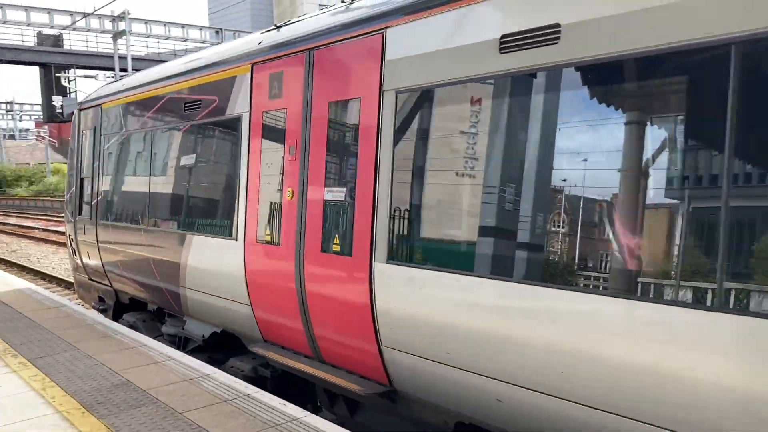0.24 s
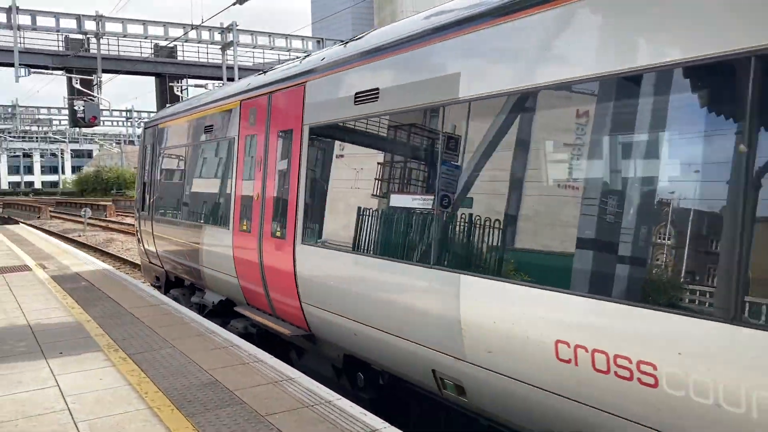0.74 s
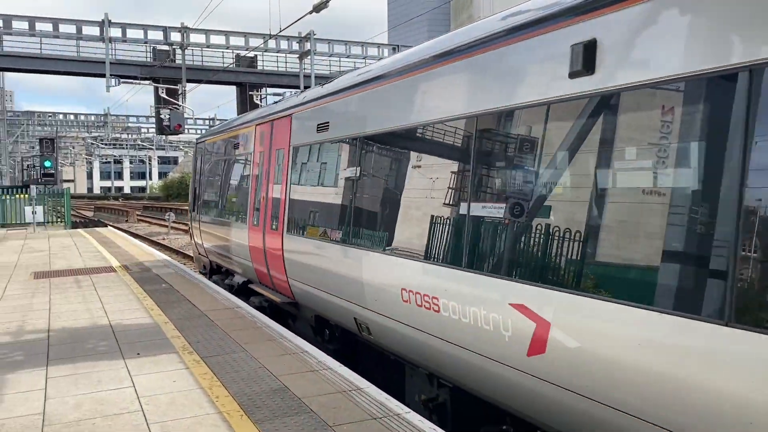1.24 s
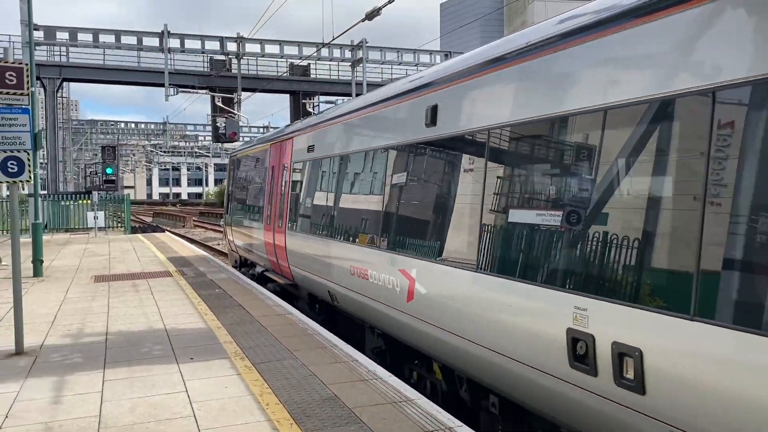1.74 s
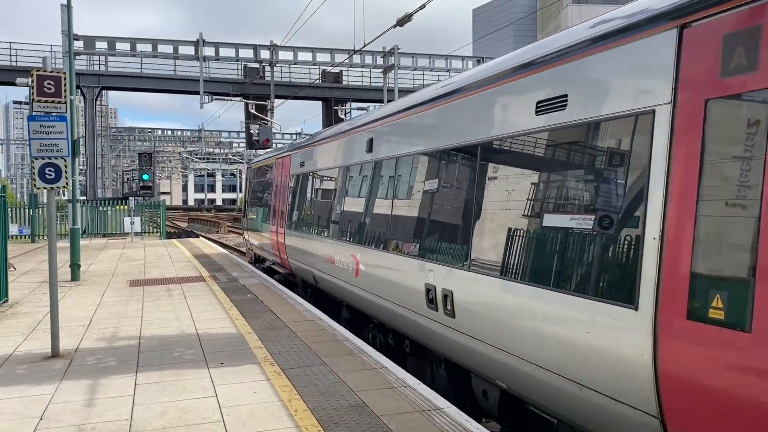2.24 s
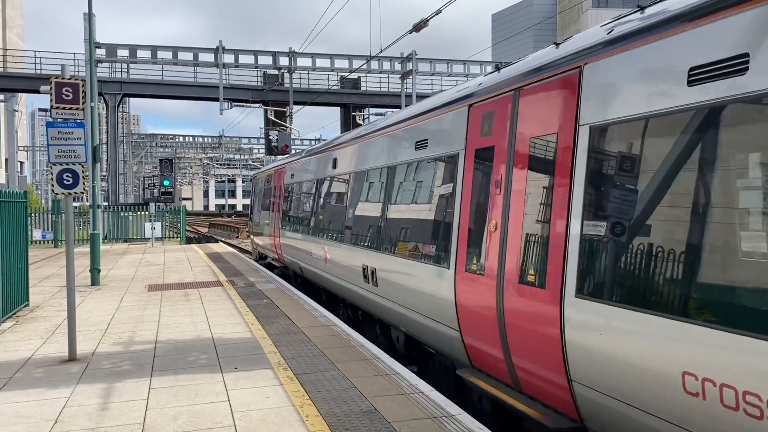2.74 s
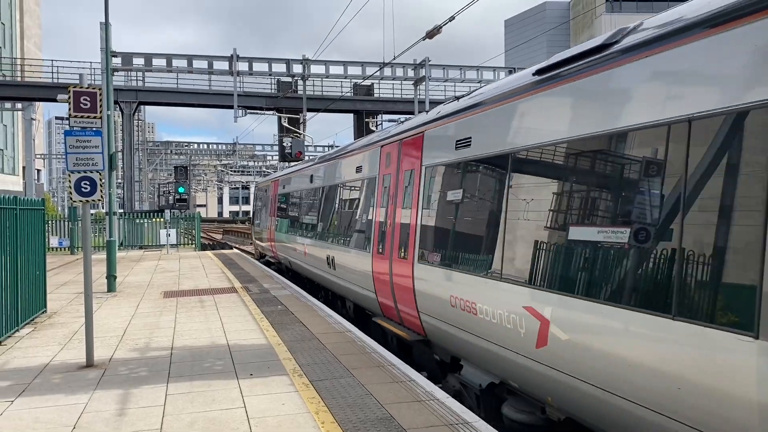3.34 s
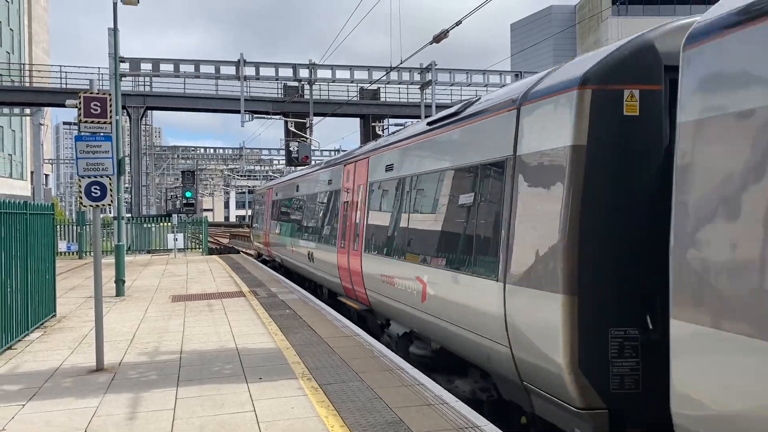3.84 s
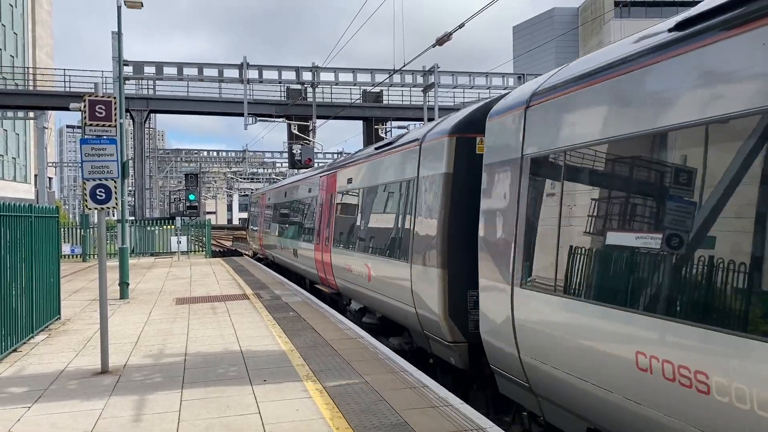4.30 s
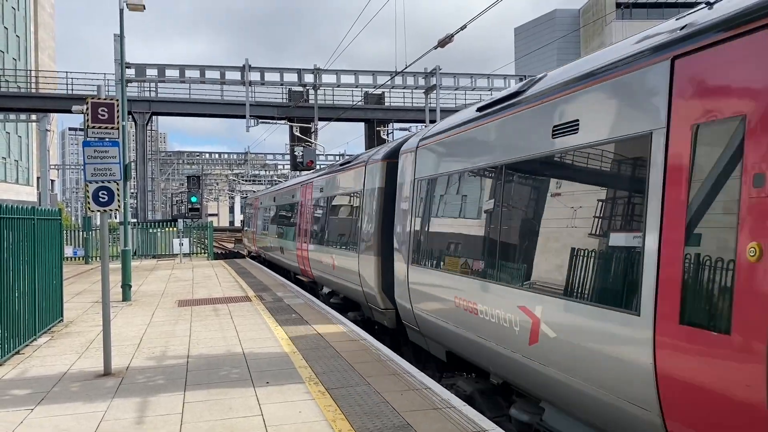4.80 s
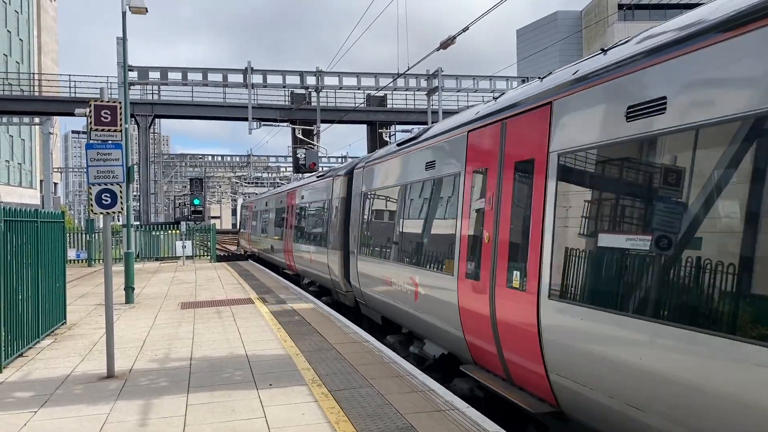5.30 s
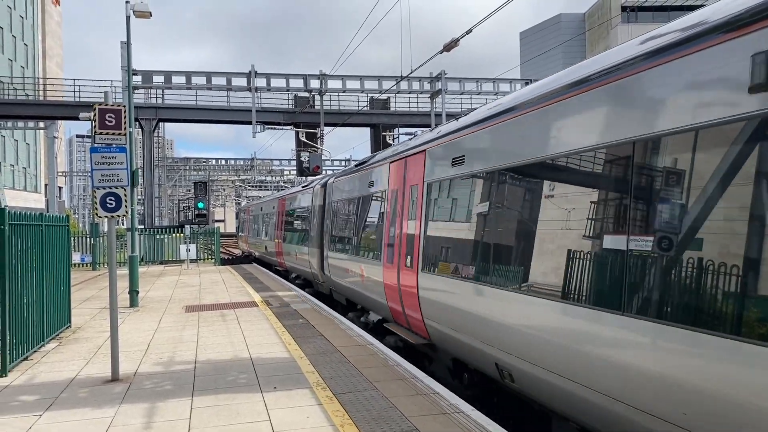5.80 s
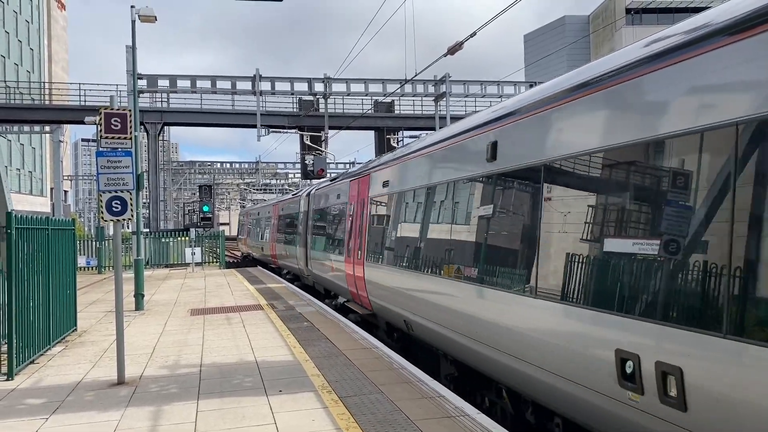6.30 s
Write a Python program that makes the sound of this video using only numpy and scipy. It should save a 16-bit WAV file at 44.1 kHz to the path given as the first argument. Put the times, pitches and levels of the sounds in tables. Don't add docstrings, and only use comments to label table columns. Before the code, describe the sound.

Close stereo sound on an open station platform as a diesel passenger train passes. From 0 s a low, throbbing engine drone wavers over soft wheel rumble, with dull thumps at about 0.3, 0.9 and 1.1 s. Around 1.5 to 2.5 s the clatter and breathy air rush grow, with a faint high turbo whistle and thin singing panels. A steady mid-high gear whine stands out around 2.5 to 3.4 s; a firm thud lands near 2.9 s, and the deep engine hum surges at about 3.2 s, broad and abreast of the listener. It beats and eases through 4 to 5 s, with a short woody creak at 4.6 s and a soft thump just after. From 5.2 s a low rising hum joins, and rumble, throbbing, roar and bright cooling-air hiss build to the fullest level by 6.3 s, ending abruptly near 6.6 s without fading away.

```python
import sys
import numpy as np
from scipy import signal
from scipy.fft import rfft, irfft, next_fast_len
from scipy.io import wavfile
from scipy.ndimage import uniform_filter1d

SR = 44100
rng = np.random.default_rng(int(sys.argv[2]) if len(sys.argv) > 2 else 0)


def field_ratio(decibels):
    return 10 ** (np.asarray(decibels, dtype=float) / 20)


def int16_out(signal):
    q = np.round(np.clip(np.atleast_2d(signal).T, -1, 1) * 32767)
    wavfile.write(sys.argv[1], SR, q.astype(np.int16))


N = 288855

# frequency in Hz, lead of the left port in radians.
ALONG_PHASE = [(0, 0), (520, -1.7), (1300, -3), (2500, -5.9), (4000, -6.1), (6940, -6.28), (15350, -18.85),
               (16000, -19)]


def evened(x):
    return x / np.sqrt(np.mean(x ** 2) + 1e-20)


def read(points, hz):
    f, value = np.transpose(points)
    return np.interp(np.log(hz + 1), np.log(f + 1), value)


def curves(rows, t):
    s, *columns = np.transpose(rows)
    return [np.interp(t, s, c) for c in columns]


def drift(t, rate):
    total = 0
    for f in np.geomspace(.3, rate, 12):
        total = total + np.sin(2 * np.pi * (f * t + rng.random())) / np.sqrt(f)
    return evened(total)


def wander(rate):
    t = np.arange(0, N + 256, 256)
    return np.interp(np.arange(N), t, drift(t / SR, rate))


def passing(parts, t):
    power = sum(field_ratio(db) ** 2 / (1 + ((t - s) / reach) ** 2) for s, db, reach in parts)
    return 10 * np.log10(power)


def fading(fades, t):
    return sum(db * np.maximum(1 - abs(t - s) / half, 0) for s, db, half in fades)


def resonate(x, hz, width):
    turn = np.exp(2j * np.pi * np.cumsum(hz * np.ones(N)) / SR)
    r = np.exp(-np.pi * width / SR)
    low = signal.lfilter([(1 - r) ** 2], [1, -2 * r, r * r], x / turn)
    return evened((turn * low).real)


def tone(hz, db, lag, pan_db=0.):
    angle = 2 * np.pi * (np.cumsum(hz) / SR + rng.random())
    left = field_ratio(pan_db / 2) * np.cos(angle - lag)
    right = field_ratio(-pan_db / 2) * np.cos(angle)
    return np.sqrt(2) * field_ratio(db) * np.array([left, right])


def ports(x):
    size = next_fast_len(N)
    turn = np.exp(1j * np.interp(np.fft.rfftfreq(size, 1 / SR), *np.transpose(ALONG_PHASE)))
    return np.array([irfft(rfft(x, size) * turn, size)[:N], x])


def layer_power(t, hz):
    # frequency in Hz, level in dB per Hz.
    rumble = [(20, -45), (30, -24), (42, 8), (58, 38.5), (90, 8.5), (140, 3.5), (220, -17), (400, -30)]
    roar = [(100, -30), (200, 1.5), (300, -2), (480, -6), (600, -6.5), (900, -8.5), (1300, -20),
            (2500, -52)]
    clatter = [(500, -7), (1000, 1.5), (1400, -3), (2000, -5), (2800, -11), (4000, -15), (6000, -25.5),
               (15000, -70)]
    hiss = [(1500, 7), (3000, -4.5), (4200, 2.5), (5600, 2), (7000, 3), (9500, -3), (12000, -4),
            (15800, -6)]
    layer_db = [3.2, 6.54, 4.8, 7.5]
    # time abreast in seconds, level abreast in dB, distance over speed in seconds.
    bogies = [(.1, -37, 0.36), (1.1, -30.5, 0.25), (2.2, -28.5, 0.68), (3.05, -25, 0.43),
              (4.6, -25.5, 0.41), (5.55, -21.5, 0.43), (6.35, -17.5, 0.24)]
    bodies = [(.5, -41, .8), (1.8, -33, 0.87), (3.1, -30, 0.7), (4.9, -30, 0.82), (5.6, -27.5, 0.21),
              (6.3, -20.5, 0.32)]
    valves = [(.3, -47, 1), (1.9, -30.5, 0.99), (3.1, -38, 0.72), (5.7, -27, 0.43), (6.3, -27, 0.29)]
    vents = [(.4, -51, .5), (1.9, -39.5, 0.56), (2.45, -49, .15), (3.5, -59.5, 0.084), (5.3, -43, 0.3),
             (6.4, -26.5, 0.39)]

    levels_db = [passing(parts, t) for parts in (bogies, bodies, valves, vents)]
    power = 0
    for shape, db, extra_db in zip((rumble, roar, clatter, hiss), levels_db, layer_db):
        colour = field_ratio(read(shape, hz)) ** 2
        share = (colour / colour.sum())[:, None]
        power = power + share * field_ratio(db + extra_db + .5 * drift(t, 11)) ** 2
    brighten = 0.45
    octaves = np.log2(np.maximum(hz, 6000) / 6000)[:, None]
    power = power * field_ratio(brighten * (levels_db[-1] + 38.5) * octaves) ** 2
    lift_db, lift_hz, lift_width_hz = 2, 9000, 900
    return power * field_ratio(lift_db * np.exp(-((hz - lift_hz) / lift_width_hz) ** 2))[:, None] ** 2


def port_link(t, hz):
    # frequency in Hz, left-right likeness from 0 to 1.
    same = [(40, .62), (120, .65), (250, .62), (500, .55), (1000, .68), (2200, .58), (4000, .74),
            (4700, .6), (5400, .1), (6200, .55), (7200, .58), (8100, .9), (9050, .99), (10100, .9),
            (11100, .97), (15000, .975)]
    # frequency in Hz, lead of the left port in radians.
    abreast_phase = [(0, 0), (700, -1.4), (1300, -1), (2200, 0), (3500, .4), (6940, 0), (15350, -12.57),
                     (16000, -12.7)]
    # time in seconds, share of sound arriving from along the platform from 0 to 1.
    direction = [
        (0, 0.65),
        (1.6, 0.9),
        (2.2, 0.17),
        (2.8, 0.02),
        (4.4, 0.1),
        (5, 0.55),
        (5.6, 0.76),
        (6.55, 0.83),
    ]
    along = np.clip(curves(direction, t)[0], 0, 1)
    turn = [np.exp(1j * np.interp(hz, *np.transpose(p)))[:, None] for p in (ALONG_PHASE, abreast_phase)]
    abreast_same = np.where(hz < 4000, 0.68, 1)[:, None]
    likeness = np.clip(read(same, hz), 0, 1)[:, None]
    return likeness * (along * turn[0] + (1 - along) * abreast_same * turn[1])


def running_noise():
    # frequency in Hz, left-right level difference in dB.
    tilt_db = [(60, 0.79), (120, 0.5), (240, 1), (480, 0.83), (950, -1.9), (1890, -0.28), (3770, 0.99),
               (7520, -1.5), (15000, 1)]
    frames, hz = N // 256 + 5, np.fft.rfftfreq(1024, 1 / SR)
    t = np.arange(frames) * 256 / SR
    power = layer_power(t, hz)
    a, b, c, d, patches = rng.standard_normal((frames, 513, 5)).T
    patches = evened(uniform_filter1d(uniform_filter1d(patches, 10, 0), 16, 1))
    link = port_link(t, hz)
    right = a + 1j * b
    left = link * right + np.sqrt(np.maximum(1 - abs(link) ** 2, 0)) * (c + 1j * d)
    tilt = field_ratio(read(tilt_db, hz) / 2)[:, None]
    z = np.array([left * tilt, right / tilt]) * np.sqrt(power) * field_ratio(patches)
    return 0.76 * signal.istft(z, nperseg=1024, noverlap=768)[1][:, :N]


def wheel_thumps(t):
    # start in seconds, level in dB, frequency in Hz, 60 dB decay time in seconds.
    thumps = [
        (0.311, -28, 85.5, 0.16),
        (.86, -21.5, 123, 0.088),
        (1.079, -24, 105, 0.13),
        (2.941, -21, 130, 0.14),
        (4.68, -28, 97, 0.23),
    ]
    out = np.zeros(N)
    for s, db, hz, t60 in thumps:
        age = np.maximum(t - s, 0)
        envelope = field_ratio(db + 12.5 - 60 * age / t60) * (1 - np.exp(-age / 0.0071))
        sag = 1 - 1.8 * np.minimum(age, .2)
        out += envelope * np.sin(2 * np.pi * hz * age * sag)
    return np.array([out, out])


def coupling_creak(t):
    # multiple of the slip rate, level in dB.
    slip_orders = [(13, 0), (12, -9), (11, -9)]
    release_s, level_db, rise_s = 4.643, -25, .066
    echo_db, echo_s = -8, .075
    slip_hz, slip_hz_per_s = 125, 50
    late = t - release_s
    swell = (late / rise_s) ** 4 - .5 * late / rise_s
    strain = np.exp(-np.where(late < 0, swell, (late / 0.0097) ** 2))
    strain = strain + field_ratio(echo_db) * (late > 0) * np.exp(-(late / echo_s) ** 4)
    turns = np.cumsum(slip_hz + slip_hz_per_s * np.clip(late, -.1, 0)) / SR
    slips = sum(field_ratio(db) * np.cos(2 * np.pi * (k * turns + rng.random())) for k, db in slip_orders)
    scrape = field_ratio(-14) * resonate(rng.standard_normal(N), 1480., 250.)
    creak = field_ratio(level_db) * strain * (slips + scrape)
    return np.array([np.roll(creak, 7), creak])


def singing_panels(t):
    # start in seconds, end in seconds, frequency in Hz, width in Hz, level in dB.
    strands = [(0, .9, 1546, 10, -50), (.9, 2.2, 1511, 10, -48), (2.45, 3, 1508, 8, -40),
               (.5, 2.6, 1131, 12, -42.5), (2.4, 4.4, 1336, 10, -44), (1.75, 2.3, 3862, 18, -43.5),
               (3.1, 4.5, 502, 14, -39), (3.4, 4.4, 471, 22, -39), (5.2, 6, 2386, 110, -47),
               (5.2, 6.55, 1669, 25, -46), (5.5, 6.6, 433, 8, -34), (5.9, 6.9, 4300, 800, -38),
               (5.2, 6.1, 479, 10, -37), (1.3, 2.7, 12900, 700, -50), (5.9, 6.6, 870, 120, -33),
               (.5, 2.1, 288, 5, -36), (1.5, 2.8, 1065, 20, -45), (1.2, 2.9, 862, 25, -42),
               (1.3, 2.2, 705, 16, -42), (3, 3.6, 1508, 10, -46), (5.7, 6.6, 712, 16, -36),
               (.9, 2, 470, 14, -44), (3.2, 4.2, 653, 20, -43)]
    noise = rng.standard_normal(N)
    low, high = np.zeros(N), np.zeros(N)
    for start, end, hz, width, db in strands:
        near = np.sqrt(abs(np.sin(np.pi * np.clip((t - start) / (end - start), 0, 1))))
        pure = .75 * (width < 19)
        hum = np.sqrt(2) * np.cos(2 * np.pi * hz * t + 2 * wander(6))
        song = field_ratio(db) * near * (pure * hum + np.sqrt(1 - pure ** 2) * resonate(noise, hz, width))
        if hz < 2000:
            low = low + song
        else:
            high = high + song
    return np.array([np.roll(low, 8), low]) + ports(high)


def turbocharger(t):
    # time abreast in seconds, level in dB, distance over speed in seconds.
    turbines = [(1.1, -54, .6), (2.75, -50, .5), (5.6, -53, .4), (6.55, -48, .4)]
    intakes = [(2.3, -46.5, 0.47), (4, -52, .8)]
    # rush frequency in Hz, width in Hz, level in dB.
    rush_bands = [(7000, 500, -3), (9950, 700, -1)]
    whistle_hz, whistle_hz_per_s = 8180, 72
    noise = rng.standard_normal((2, N))
    whistle = resonate(noise[0], whistle_hz + whistle_hz_per_s * t, 230)
    rush = sum(field_ratio(db) * resonate(noise[1], hz, width) for hz, width, db in rush_bands)
    return ports(field_ratio(passing(turbines, t)) * whistle + field_ratio(passing(intakes, t)) * rush)


def gear_whine(t):
    # time abreast in seconds, level in dB, distance over speed in seconds.
    gearboxes = [(.3, -47, .35), (1.28, -43, .03), (1.9, -51, .25), (2.6, -41, .4), (3.3, -39, .25),
                 (5.5, -49, 1.5)]
    # time in seconds, depth in dB, half length in seconds.
    gear_fades = [(3.85, 10, .3), (4.8, 4, 0.58)]
    mesh_hz = 1938
    noise = rng.standard_normal((3, N))
    db = passing(gearboxes, t) - fading(gear_fades, t)
    opposed = np.array([[1], [-1]]) * resonate(noise[2], mesh_hz, 30)
    mesh = resonate(noise[0], mesh_hz, 40) + .6 * opposed
    return field_ratio(db) * mesh + field_ratio(db - 12) * resonate(noise[1], 2 * mesh_hz, 35)


def shaft(t):
    # time abreast in seconds, level in dB, distance over speed in seconds.
    shafts = [(3.9, -30, .3), (4.9, -34.5, .2), (5.3, -23, 0.18), (5.7, -19, .2), (6.55, -31, 0.098)]
    shafts_twice = [(4.5, -28.5, .12), (5.55, -20.5, 0.034), (6.1, -29.5, 0.16), (6.45, -26, 0.14)]
    # time in seconds, depth in dB, half length in seconds.
    shaft_fades = [(4.55, 11, .2), (6.1, 6, 0.2)]
    from_s, from_hz, hz_per_s = 3.6, 38.46, 8.3
    hz = from_hz + hz_per_s * (t - from_s)
    fade_in = np.clip((t - from_s) / 0.29, 0, 1)
    once_db = passing(shafts, t) - fading(shaft_fades, t)
    once = tone(hz * (1 + 0.019 * wander(3.78)), once_db, 0.18)
    twice = tone(2 * hz, passing(shafts_twice, t) + 2.2 * wander(9), 0.32)
    return fade_in * (once + twice)


def engines(t):
    # time in seconds, crank rate in Hz, sixth order in dB, ninth order in dB.
    exhaust = [(0, 26.22, -28.5, -33.5), (.3, 26.57, -24.5, -32.5), (.72, 26.4, -26.5, -26),
               (1.15, 26.35, -23.5, -25), (1.55, 26.23, -25, -18), (2.05, 26.38, -25, -24),
               (2.6, 26.61, -18, -25.5), (2.95, 26.44, -20.5, -18), (3.23, 26.38, -14, -20),
               (3.6, 26.29, -18.5, -17.5), (3.98, 26.55, -18.5, -20.5), (4.3, 26.76, -24.5, -19.5),
               (4.78, 26.49, -24.5, -19.5), (5.2, 26.55, -21.5, -20), (5.65, 26.8, -22, -19),
               (5.9, 26.67, -18.5, -14.5), (6.22, 26.81, -27.5, -11.5), (6.55, 26.76, -19.5, -17.5)]
    # time in seconds, depth in dB, half length in seconds.
    sixth_fades = [(0, 17, 0.085), (.17, 3.5, .07), (.47, 6, 0.11), (.66, 7.5, 0.1), (.84, 18, 0.072),
                   (1.07, 5, 0.096), (1.44, 8.5, 0.21), (1.77, 8, 0.18), (1.99, 2, 0.087), (2.75, 0, 0.066),
                   (3.05, 2.5, 0.086), (3.37, 2.5, 0.091), (3.74, 4.5, 0.13), (4.45, 11, 0.12),
                   (4.69, 7, 0.11), (4.86, 12, .1), (5.03, 7, 0.13), (5.38, 9, 0.14), (5.58, 10, 0.087),
                   (5.78, 10, .12), (6.05, -1, 0.077), (6.27, 5, .1)]
    ninth_fades = [(.05, 6.8, 0.15), (.82, 5, 0.28), (1.77, 3, 0.093), (2.52, 17, 0.078), (2.7, 5, 0.15),
                   (3.23, 6.5, .12), (3.52, 8.8, 0.14), (3.83, 8.9, .11), (4.08, 16.5, 0.12),
                   (4.69, 2.9, 0.09), (5, 23, 0.18), (5.49, 6.8, .13)]
    # time in seconds, sixth left-right in dB,
    # ninth left-right in dB, ninth left lag in radians.
    lean = [(0, -1, 5, 0.98), (.5, 2, 4.5, 0.28), (1.05, 6, -1, 0.46), (1.75, -1.5, -3.5, 1.07),
            (2.1, -4, 0, 0.61), (2.75, 5, 2, 0.43), (3.2, -2, -1.5, 0.34), (3.55, 3.5, 3, 0.51),
            (4, -1, -2, 0), (4.7, -2, 0.5, 0.43), (5.35, 1, 3.5, 0.35), (5.7, 5, -1, .8),
            (6.2, 2, -1, 0.93), (6.55, 2, 5.5, 0.99)]
    # time abreast in seconds, level in dB, distance over speed in seconds.
    blocks = [(.25, -50, .6), (1.4, -37, .3), (3.4, -29.5, 0.53), (4.1, -33, 0.48), (5.5, -28, 0.18),
              (6.3, -27.5, 0.37)]
    # multiple of the crank rate, level in dB.
    orders_db = [(4, -5), (5, -4.5), (7, -9), (8, -4), (10, -3.5), (11, -5), (12, -5), (13, -9),
                 (15, -11.5), (16, -12.5), (18, -9), (25, -20), (30, -18), (36, -19)]

    hz, sixth_db, ninth_db = curves(exhaust, t)
    sixth_pan_db, ninth_pan_db, ninth_lag = curves(lean, t)
    sixth_lag = 0.34 + 0.12 * wander(1.66)
    out = tone(6 * hz, sixth_db - fading(sixth_fades, t), sixth_lag, sixth_pan_db)
    out += tone(9 * hz, ninth_db - fading(ninth_fades, t), ninth_lag, ninth_pan_db)
    rest_db = passing(blocks, t)
    for k, db in orders_db:
        swell_db = np.minimum(4 * wander(10), 3)
        order_hz = k * hz * (1 + 0.00519 * wander(12))
        lag = 0.093 * k + .5 * wander(3)
        out += tone(order_hz, rest_db + db + swell_db, lag, 2.7 * wander(2.16))
    return out


def scene():
    t = np.arange(N) / SR
    background = running_noise() + wheel_thumps(t) + coupling_creak(t)
    whines = singing_panels(t) + turbocharger(t) + gear_whine(t)
    return background + whines + shaft(t) + engines(t)


def roll_off(x):
    return signal.sosfilt(signal.butter(12, 16080, fs=SR, output="sos"), x)


def record(dry):
    dry = signal.sosfilt(signal.butter(6, 38, "high", fs=SR, output="sos"), dry)
    dry = 1.29 * np.tanh(dry / 1.24)
    edge = signal.firwin(511, 15730, window=("kaiser", 9), fs=SR)
    mix = signal.oaconvolve(dry, edge[None], "same")
    return roll_off(mix)


dry = scene()
out = record(dry)
int16_out(out)
```